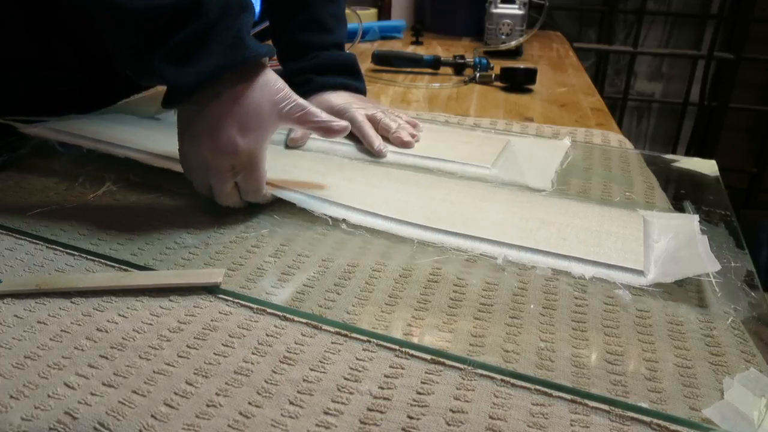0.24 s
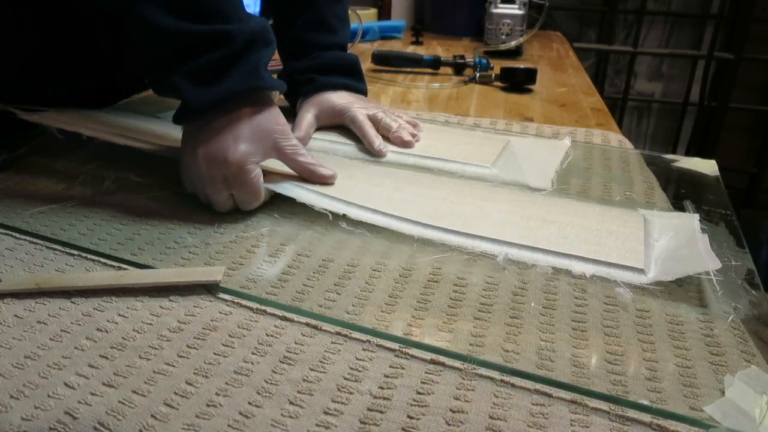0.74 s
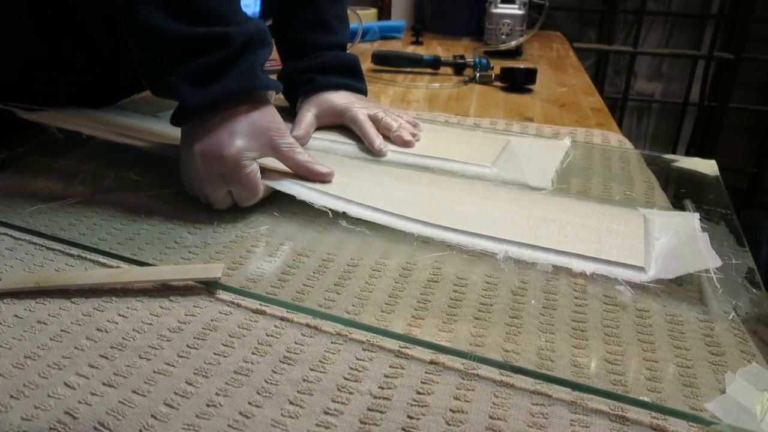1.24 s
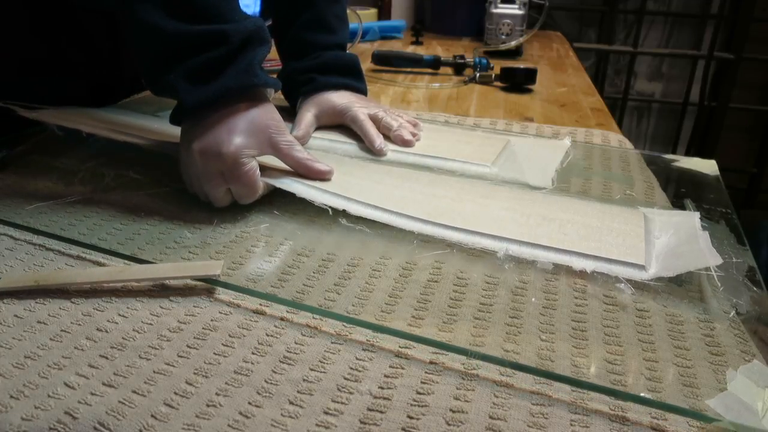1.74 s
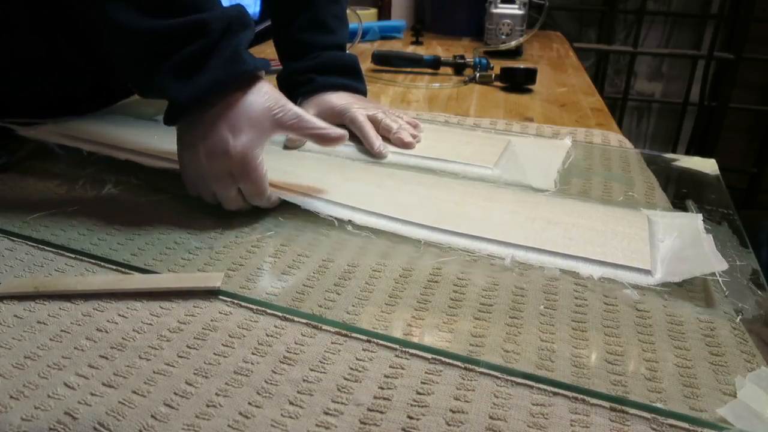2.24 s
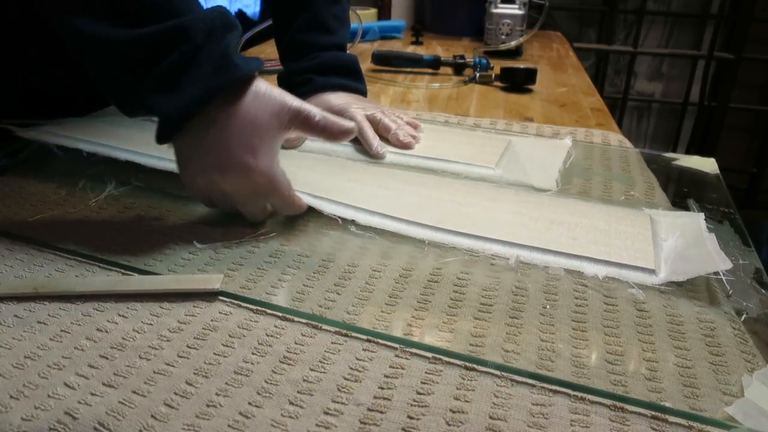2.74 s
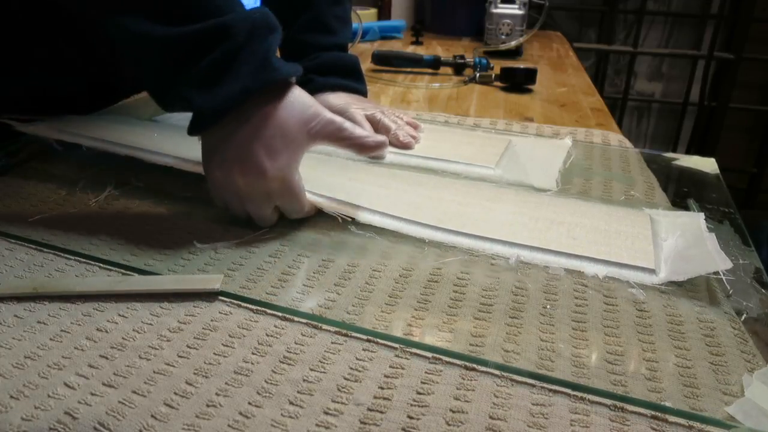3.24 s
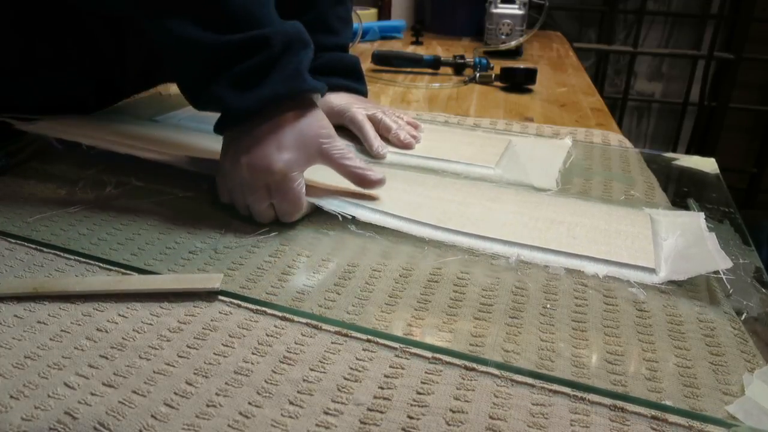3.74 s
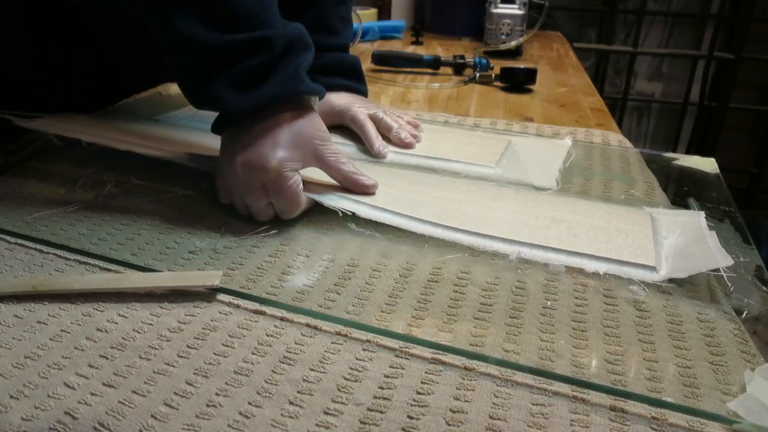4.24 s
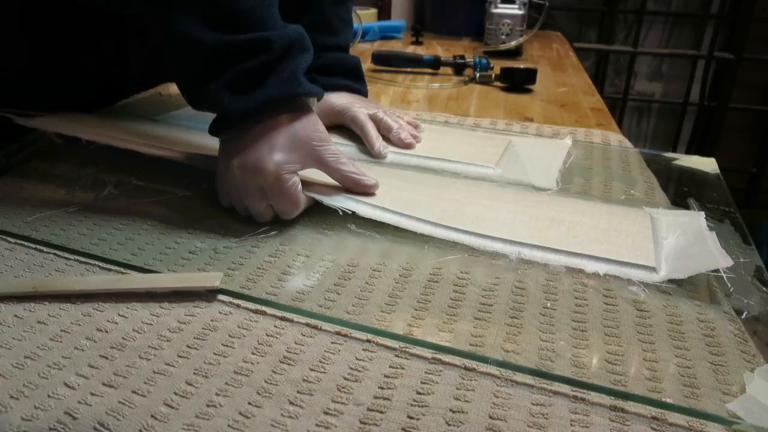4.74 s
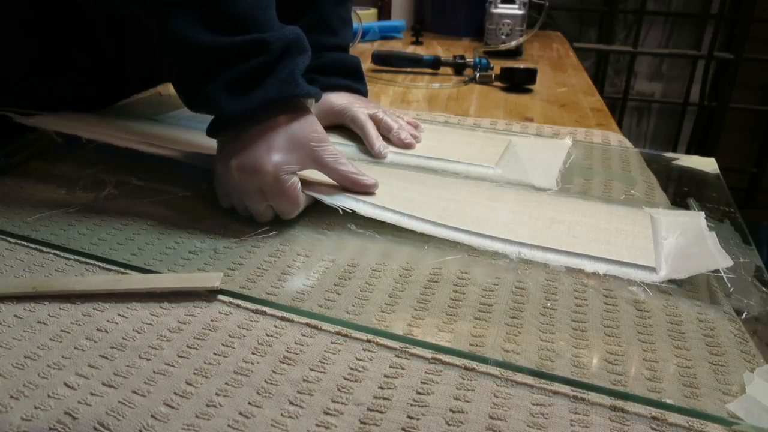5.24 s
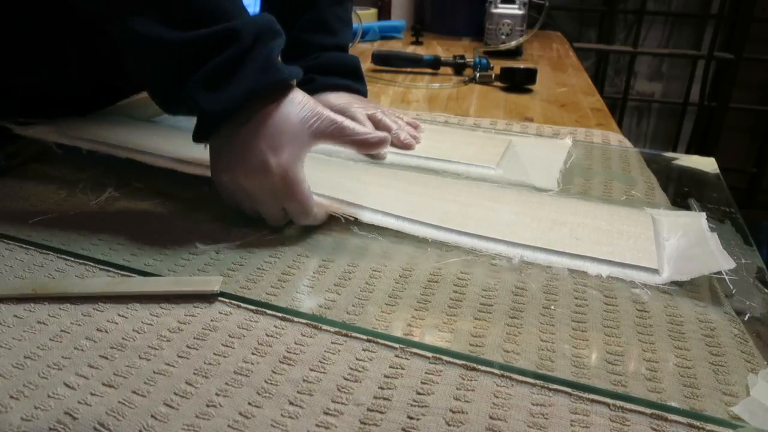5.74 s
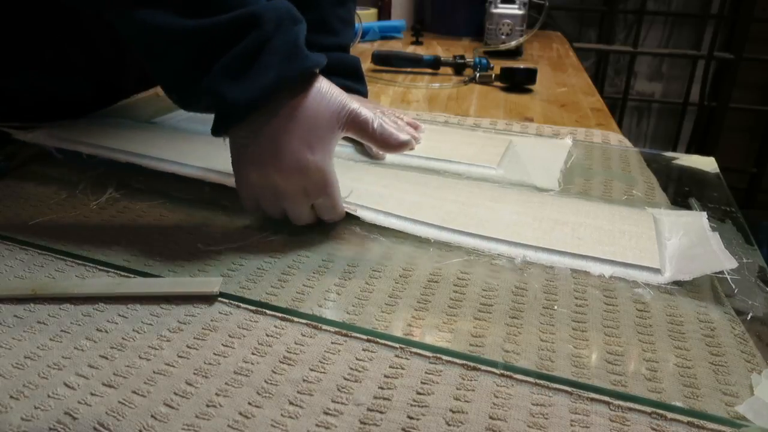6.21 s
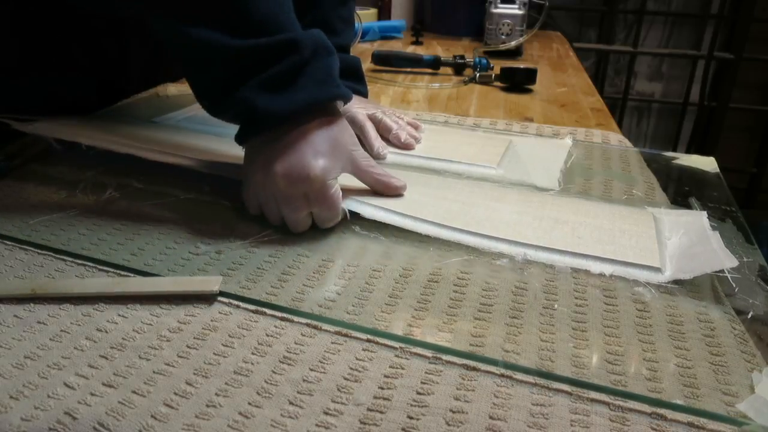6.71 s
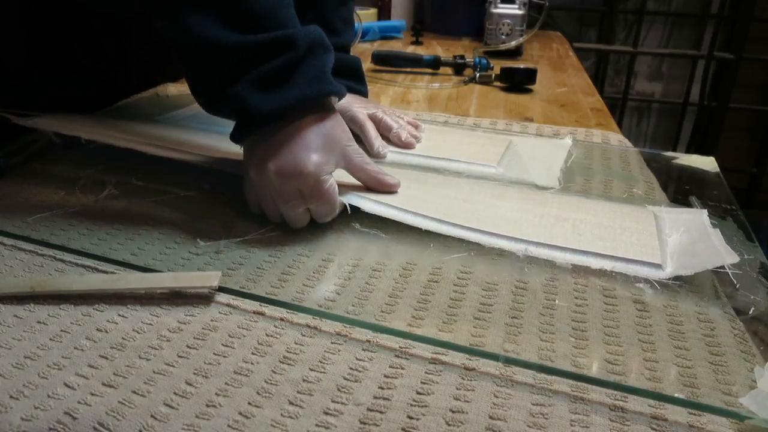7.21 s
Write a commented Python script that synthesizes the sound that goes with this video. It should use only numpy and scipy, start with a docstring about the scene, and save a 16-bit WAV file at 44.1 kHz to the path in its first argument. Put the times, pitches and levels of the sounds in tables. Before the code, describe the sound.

Gloved hands work a small wedge under a stuck sheet: dry, brittle crackles and crisp snaps in uneven pushes, with dull low knocks of panel on glass. It starts abruptly, thins out, thumps once, grows into heavy tearing, nearly stops, then finishes with a short fresh burst. Microphones are very near, slightly favouring the right, with short, dense workshop reverberation and quiet hissy air with low hum.

```python
"""A stiff cured laminate panel is pried off a glass plate with a small wedge, close to a stereo microphone pair.
It opens with a tear and sharp snaps, each a run or single burst of coloured cracks; dull knocks ring panel modes.
Sparse tears and the loudest knock near 2.2 s lead to heavy tearing from 3.7 to 5.4 s, with faint stray ticks.
After a near-pause the edge rings high near 6.5 s, and a last group of tears and snaps ends near 7.5 s.
A small workshop answers with dense decaying noise, over steady air noise and hum, whose level the recorder's
gain, written out as a fixed curve, moves down and up."""
import sys
import numpy as np
from scipy import signal
from scipy.fft import rfft, irfft, next_fast_len
from scipy.io import wavfile

SR = 44100
rng = np.random.default_rng(int(sys.argv[2]) if len(sys.argv) > 2 else 0)


def persist_wave(psi):
    """Save psi, clipped to +-1, as 16-bit WAV."""
    counts = np.round(np.clip(psi, -1, 1) * 32767).astype(np.int16)
    wavfile.write(sys.argv[1], SR, np.atleast_2d(counts).T)


N = 329427


def from_db(db):
    """Decibels to amplitude gain."""
    return 10 ** (np.asarray(db) / 20)


def rms_one(x):
    """Scale to rms 1."""
    return x / np.sqrt(np.mean(x ** 2) + 1e-20)


def unit_energy(pulse):
    """Scale a stereo pulse to an energy of 1, averaged over the two channels."""
    return pulse / np.sqrt(np.sum(pulse ** 2) / 2)


def at_hz(points, hz):
    """Read a (f/Hz, level/dB) table on a log-frequency axis."""
    points = np.array(points)
    return np.interp(np.log(np.maximum(hz, 1)), np.log(points[:, 0]), points[:, 1])


def add(out, s, sound):
    """Mix a sound in at a time in seconds."""
    start = max(0, round(s * SR))
    out[:, start:start + sound.shape[-1]] += sound[..., :N - start]


def colour(x, db_at):
    """Causal (minimum-phase) filter with the gain db_at(Hz), made by folding the cepstrum."""
    size = 2 * next_fast_len(x.shape[-1] // 2 + SR // 40)
    hz = np.arange(size // 2 + 1) * SR / size
    cepstrum = irfft(np.log(from_db(db_at(hz))))
    cepstrum[1:size // 2] *= 2
    cepstrum[size // 2 + 1:] = 0
    response = np.exp(rfft(cepstrum))
    return irfft(rfft(x, size) * response)[..., :x.shape[-1]]


# width of diffuse sound at two close microphones: (f/Hz, side minus mid level/dB)
STEREO_WIDTH = [(100, 3), (400, 3), (1200, -5), (2500, -14.5), (5000, -12), (9000, -3), (14000, -3.5)]


def diffuse(size):
    """White stereo noise, nearly alike on both sides in the middle range and wider in bass and treble."""
    mid, side = rng.standard_normal((2, size))
    side = colour(side, lambda hz: at_hz(STEREO_WIDTH, hz))
    left_right = np.array([mid + side, mid - side])
    # take back the power that the side signal adds
    return colour(left_right, lambda hz: -10 * np.log10(1 + from_db(at_hz(STEREO_WIDTH, hz)) ** 2))


# background level as the recorder's automatic gain sinks and recovers, written out as a fixed curve:
# (t/s, level/dB before the common trim)
BACKGROUND_LEVEL = [(0.0, -68), (0.77, -67.5), (0.94, -84.5), (1.14, -84.5), (1.91, -76), (2.25, -69.5),
                    (2.89, -69), (2.99, -65.5), (3.89, -73.5), (3.99, -82.5), (4.26, -72.5), (4.45, -75),
                    (5.18, -68.5), (5.37, -76), (5.91, -77.5), (6.05, -74), (7.47, -70.5)]
# spectrum of the air noise: (f/Hz, relative density level/dB per Hz)
AIR_SPECTRUM = [(18, -46.5), (30, -19), (70, -16.5), (93, -7), (131, -4.5), (189, -1.5), (473, -3),
                (616, -4.5), (684, -6), (1460, -10), (2290, -11.5), (2540, -11.5), (12300, -21.5),
                (16000, -31)]


def air(trim_db=9.0, hum_hz=100, hum_db=-18.0, overtone_db=-20.5):
    """Steady soft room noise with a faint mains hum and its octave, under the recorder's gain curve."""
    t = np.arange(N) / SR
    hiss = rms_one(colour(diffuse(N), lambda hz: at_hz(AIR_SPECTRUM, hz)))
    hum = from_db(hum_db) * np.sin(2 * np.pi * hum_hz * t)
    octave = from_db(overtone_db) * np.sin(2 * np.pi * 2 * hum_hz * t)
    level_db = trim_db + np.interp(t, *np.transpose(BACKGROUND_LEVEL))
    return from_db(level_db) * (hiss + hum + octave)


# reverberation against direct sound: (f/Hz, level/dB)
ROOM_LEVEL = [(150, -5), (900, -3), (2500, -3), (6000, -8.5), (15000, -7.5)]


def workshop(x, build_s=0.0034, bass_t60=0.19, absorb_hz=14000):
    """Dense reflections build up in a few milliseconds and die sooner in the treble."""
    t = np.arange(SR // 3) / SR
    noises = [diffuse(2 * len(t)), diffuse(2 * len(t))]
    echo = np.zeros((2, len(t)))
    edges = np.geomspace(60, 18000, 12)
    for k, (low, high) in enumerate(zip(edges, edges[1:])):
        hz = np.sqrt(low * high)
        build = 1 - np.exp(-(t / build_s) ** 2)
        decay = from_db(-60 * t / bass_t60 * (1 + hz / absorb_hz)) * build
        band_filter = signal.butter(2, [low, high], "band", fs=SR, output="sos")
        # neighbouring bands use separate noises; the first half lets the filter settle
        band = signal.sosfilt(band_filter, noises[k % 2])[:, len(t):]
        echo += from_db(at_hz(ROOM_LEVEL, hz)) * band * decay / np.sqrt(np.sum(decay ** 2))
    return signal.fftconvolve(x, echo, axes=1)[:, :N]


# dull knocks of panel and hand on the plate: (t/s, peak level/dB before trim, contact hardness f/Hz)
KNOCKS = [(0.251, -37, 200), (0.819, -42.5, 527), (2.167, -22.5, 930), (2.329, -51, 497),
          (2.55, -47.5, 195), (3.156, -49.5, 604), (3.506, -47, 398), (5.561, -45.5, 610),
          (5.917, -54, 98.4), (6.926, -45.5, 400), (7.126, -50.5, 454)]
# modes of the panel lying on the glass: (f/Hz, relative level/dB, t60/s)
PANEL_MODES = [(106, -12.5, 0.032), (205, -7, 0.052), (299, -4.5, 0.056), (408, 0.5, 0.029),
               (481, -5.5, 0.076), (624, 5, 0.018), (770, 1.5, 0.022), (957, 0, 0.033), (1133, -0.5, 0.042),
               (1610, 2.5, 0.015)]
# time between touches; loss, times the touch number squared; share of the hardness kept at each touch
SETTLE_S, SETTLE_LOSS_DB, SETTLE_HARDNESS = .0301, 7, 0.44


def knocking(trim_db=-2.0, lowest_hz=100, contact_s=0.00097, touches=3):
    """A soft contact sets the damped low modes of the panel ringing; it settles in weaker, softer touches."""
    out, t = np.zeros((2, N)), np.arange(SR // 4) / SR
    body = np.zeros(len(t))
    for k, (hz, db, t60) in enumerate(PANEL_MODES):
        sign = (-1) ** k
        body += sign * from_db(db - 60 * t / t60) * np.sin(2 * np.pi * hz * t)
    body *= 1 - np.exp(-t / contact_s)
    body = signal.sosfilt(signal.butter(1, lowest_hz, "high", fs=SR, output="sos"), body)
    for s, db, hard_hz in KNOCKS:
        for touch in range(touches):
            touch_hz = hard_hz * SETTLE_HARDNESS ** touch
            knock = signal.sosfilt(signal.butter(2, touch_hz, fs=SR, output="sos"), body)
            gain = from_db(db + trim_db - SETTLE_LOSS_DB * touch ** 2)
            add(out, s + touch * SETTLE_S, gain * knock / np.abs(knock).max())
    return out


# basic colour of a crack: (f/Hz, level/dB)
CRACK_COLOUR = [(100, -31), (400, -11), (1000, -6.5), (2500, -2.5), (4600, 1.5), (6500, 2), (8800, 0),
                (10500, 1), (12300, 5), (14500, -1), (16000, -7)]


def crack_colour(hz, edge_hz, ring_db, sizzle_db, below_db=-9.0, ring_width=0.149, overtone=1.9,
                 overtone_share=0.21, sizzle_hz=9500):
    """The lifted edge rings at its own pitch and one overtone and radiates less below; sizzle lifts the top."""
    below = below_db / (1 + (hz / (0.74 * edge_hz)) ** 8)
    first = 1 / (1 + ((hz / edge_hz - 1) / ring_width) ** 2)
    second = 1 / (1 + ((hz / (overtone * edge_hz) - 1) / ring_width) ** 2)
    ring = max(ring_db, 0) * (first + overtone_share * second)
    sizzle = sizzle_db * (1 - 1 / (1 + (hz / sizzle_hz) ** 7))
    return at_hz(CRACK_COLOUR, hz) + below + ring + sizzle


def crack_pulse(scatter_db, t60):
    """One crack: a spike, then a few milliseconds of waves scattered in panel and glass."""
    t = np.arange(SR // 60) / SR
    scatter = diffuse(len(t)) * from_db(-60 * t / t60)
    pulse = from_db(scatter_db) * unit_energy(scatter)
    pulse[:, 0] += 1
    return pulse


def snap(energy_db, sizzle_db, edge_hz=2400):
    """A patch of the bond lets go at once: one coloured crack of set energy, without edge ring."""
    pulse = crack_pulse(scatter_db=6.0, t60=0.0083)
    pulse = colour(pulse, lambda hz: crack_colour(hz, edge_hz, 0, sizzle_db))
    return from_db(energy_db) * unit_energy(pulse)


# stretches when the wedge holds the bond under strain: (start t/s, end t/s, mean tick energy level/dB)
STRAINS = [(1.104, 1.648, -43.5), (4.138, 5.302, -28.5), (6.55, 6.902, -40), (6.953, 7.448, -30.5)]
TICKS_PER_S = 38


def creeping(spread_db=2.0, sizzle_db=2.5):
    """The strained bond gives way in faint ticks, scattered at random over each stretch."""
    out = np.zeros((2, N))
    for start, end, energy_db in STRAINS:
        ticks = round(TICKS_PER_S * (end - start))
        for when, size in rng.uniform([start, -1], [end, 1], (ticks, 2)):
            add(out, when, snap(energy_db + spread_db * size, sizzle_db))
    return out


# pushes that tear the bond: (start t/s, swell t/s, fade t/s, crest level/dB before trim,
# lifted edge f/Hz, edge ring level/dB with negatives as none, sizzle level/dB)
TEARS = [(0.103, 0.026, 0.035, -34, 1710, 21.5, 12), (0.577, .04, 0.011, -42.5, 2810, 13, 13.5),
         (0.631, 0.0043, 0.034, -26, 1154, 12, -5), (0.716, 0.016, 0.075, -28, 1100, 7.5, 0.5),
         (0.813, .026, .05, -27.5, 853, 11, -2.5), (1.294, .03, 0.05, -46, 900, 3, 7.5),
         (1.826, .018, 0.012, -47.5, 2400, 13, 20), (1.976, .022, 0.026, -40.5, 2600, 17, 18),
         (2.433, .018, 0.0077, -50, 2400, -5, 12), (2.549, .004, 0.02, -40, 2400, -0.5, -0.5),
         (2.88, 0.037, 0.02, -37, 930, 20, 6), (2.906, .008, 0.012, -36.5, 2770, 25.5, -12),
         (3.729, .031, 0.021, -33, 1680, 13.5, 6), (3.856, .05, 0.013, -24.5, 1900, 3.5, 8),
         (3.917, .006, .022, -19.5, 610, 6.5, 0), (3.94, .008, 0.054, -24.5, 1800, -1, 2.5),
         (4.217, .012, 0.066, -41.5, 1810, 8.5, 14.5), (4.302, .035, 0.027, -40.5, 1760, 3, 2),
         (4.427, .008, 0.062, -29.5, 1760, 0, 4.5), (4.617, 0.0035, 0.079, -27.5, 1580, 1, 5.5),
         (4.754, .045, 0.065, -35, 1800, -4, 2), (4.878, .04, 0.06, -48.5, 2160, 3, 4.5),
         (4.948, 0.016, 0.062, -20.5, 1580, 5.5, 8), (5.0, .012, 0.13, -26, 1560, 3, 4.5),
         (5.305, .045, 0.023, -29.5, 1440, 4, -1), (5.86, .012, 0.024, -60, 2400, 4, 2),
         (6.16, 0.042, 0.028, -62, 1500, -1.5, 0), (6.383, .008, 0.014, -54.5, 5200, 16, -6),
         (6.494, 0.015, 0.019, -39.5, 1053, 25, 0.5), (6.499, 0.005, 0.011, -41, 5100, 29, -2),
         (6.927, 0.026, 0.027, -38, 2050, 2, -1.5), (7.009, .02, 0.047, -38, 2600, 12, 15),
         (7.219, 0.026, 0.0066, -44.5, 2300, 0, 14), (7.256, 0.029, 0.079, -28.5, 2430, -11, 9),
         (7.351, .018, 0.018, -28.5, 2430, 3, 3.5)]
# single sharp cracks: (t/s, energy level/dB before trim, sizzle level/dB)
SNAPS = [(0.099, -13, 16), (0.1206, -2, 17.5), (0.6393, 4.5, 8.5), (0.6872, -11, 8), (0.717, -12, 6),
         (1.0677, -33, -3), (1.3232, -15.5, 20), (1.42, -30, -4), (1.8928, -23, 4.5), (2.108, -21.5, 7),
         (2.4853, -10, 17.5), (2.5485, -10, 31), (3.1598, -23.5, -17), (3.7605, -5, 5.5), (3.862, -5, 0),
         (3.9108, 3, -4), (4.2592, -9, 49), (4.3434, -6, 37), (4.573, -10, 14.5), (4.6257, 4, 6),
         (4.6657, 5, 6), (4.755, -7, -22), (4.8018, 3, 10.5), (4.9632, 3, 2.5), (5.0125, 5.5, 7),
         (5.0534, 7.5, 15.5), (5.1038, 6, 4), (5.1684, -4, 7), (5.233, -22.5, 5), (5.353, 1, 14.5),
         (6.4933, -17, 12), (7.0106, -7.5, 8.5), (7.0501, -5, 11.5), (7.1427, -23, 9), (7.2179, -24, 15),
         (7.3114, 6.5, 9.5), (7.4505, -7, 13.5)]


def snapping(trim_db=-0.22, tick_db=4.0, tick_spread_db=2.5, tick_sizzle_db=7.0, linger_s=.03, ticks=4):
    """Sharp single snaps, and stray ticks from the strained bond during and just after every push."""
    out = np.zeros((2, N))
    for s, energy_db, sizzle_db in SNAPS:
        add(out, s, snap(energy_db + trim_db, sizzle_db))
    for s, swell_s, fade_s, db, *_ in TEARS:
        span_s = swell_s + fade_s + linger_s
        for when, size in rng.uniform([0, -1], [1, 1], (ticks, 2)):
            add(out, s + when * span_s, snap(db + tick_db + tick_spread_db * size, tick_sizzle_db))
    return out


# a push starts this far under its crest, and has sunk this far when the front stops
SWELL_DB, FADE_DB = 11.5, 13.5


def tearing(cracks_per_s=1300, spread_db=3.5, biggest=4.55, trim_db=1.0, lead_s=.005, stop_s=0.0053,
            clump_db=4.5, clump_s=0.00595, places=2):
    """The crack front swells and fades with each push, jumping in clumps of random steps at two places."""
    out, margin = np.zeros((2, N)), .03  # margin in s before and after a push
    for s, swell_s, fade_s, db, edge_hz, ring_db, sizzle_db in TEARS:
        length = swell_s + fade_s
        t = np.arange(int((length + 2 * margin) * SR)) / SR - margin
        push = from_db(np.interp(t, [0, swell_s, length], [-SWELL_DB, 0, -FADE_DB]))
        # exponential flanks before the start and after the stop
        push *= np.exp(np.minimum(t, 0) / lead_s - np.maximum(t - length, 0) / stop_s)
        run = np.zeros((2, len(t)))
        for place in range(places):
            grip = np.interp((t + margin) / clump_s, np.arange(64), rng.standard_normal(64))
            sizes = from_db(spread_db * np.minimum(rng.exponential(1, len(t)), biggest))
            signs = rng.choice([-1, 1], len(t))
            happens = rng.random(len(t)) < cracks_per_s / SR
            steps = push * from_db(clump_db * grip) * sizes * signs * happens
            pulse = crack_pulse(scatter_db=4.5, t60=0.018)
            run += signal.fftconvolve(steps[None], pulse, axes=1)[:, :len(t)]
        run = colour(run, lambda hz: crack_colour(hz, edge_hz, ring_db, sizzle_db))
        push_rms = np.sqrt(np.mean(push ** 2))
        add(out, s - margin, from_db(db + trim_db) * rms_one(run) * push_rms)
    return out


def scene(right_db=0.45):
    """The panel lies just right of centre, close to the microphones, with the room and its air around it."""
    panel = tearing() + snapping() + creeping() + knocking()
    panel = panel * from_db([[-right_db], [right_db]])
    return panel + workshop(panel) + air()


def record(dry, cutoff_hz=16000):
    """An elliptic low-pass cuts the top steeply."""
    return signal.sosfilt(signal.ellip(10, .3, 70, cutoff_hz, fs=SR, output="sos"), dry)


dry = scene()
out = record(dry)
persist_wave(out)
```